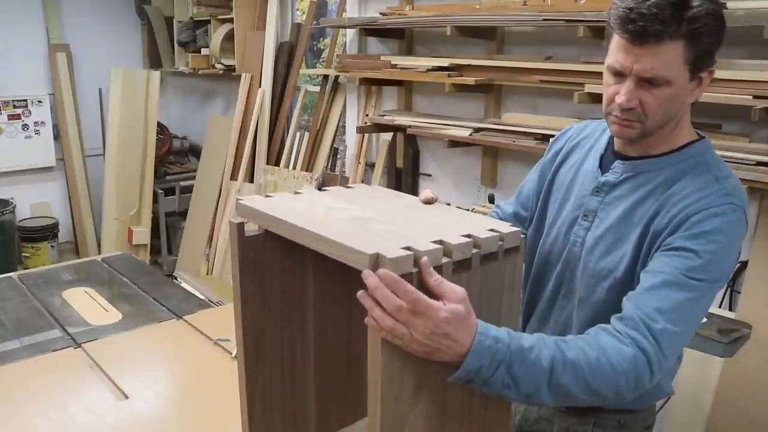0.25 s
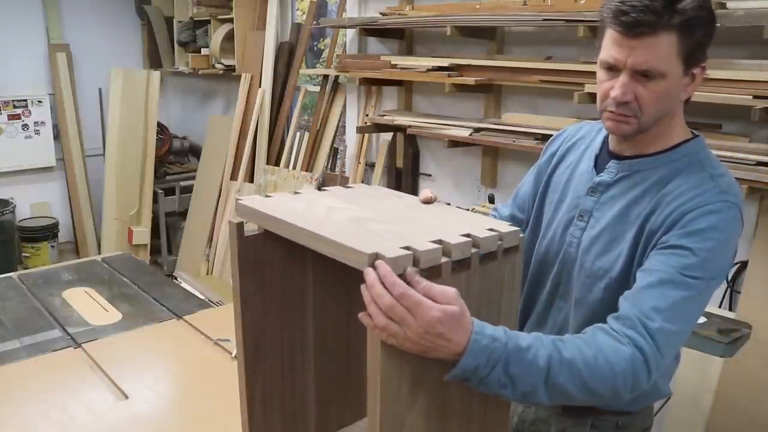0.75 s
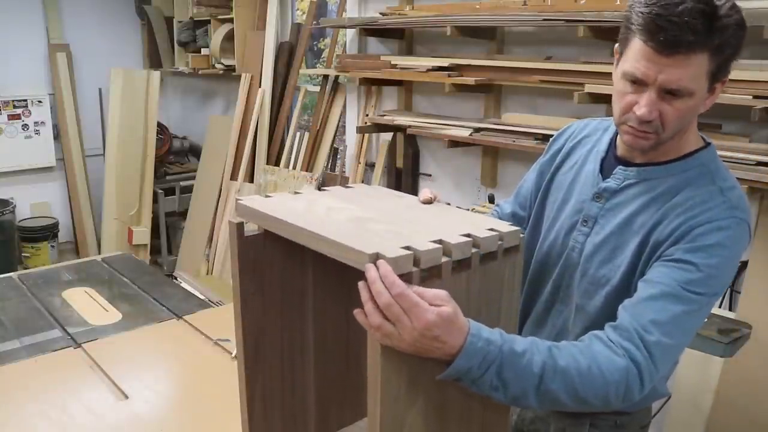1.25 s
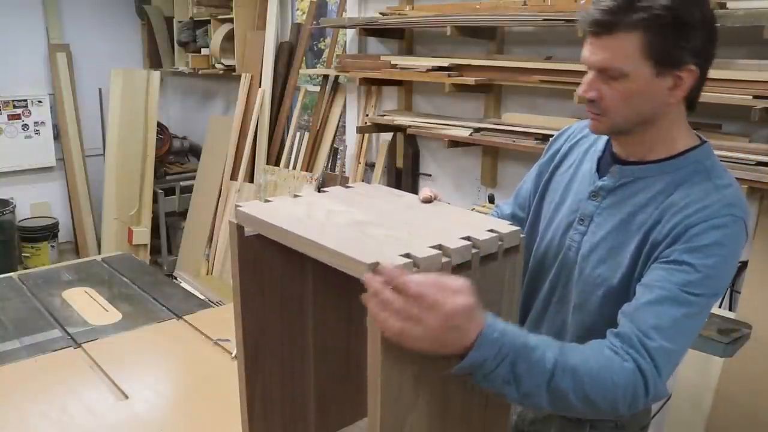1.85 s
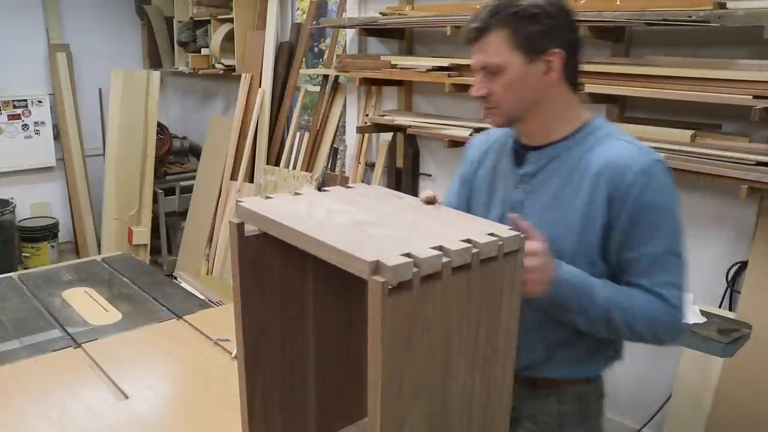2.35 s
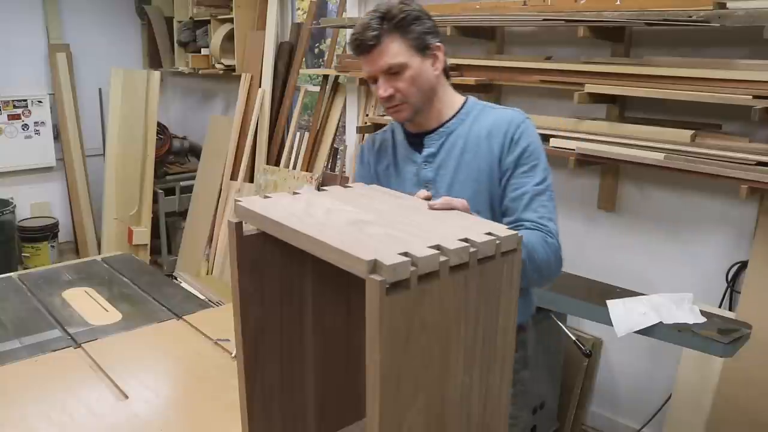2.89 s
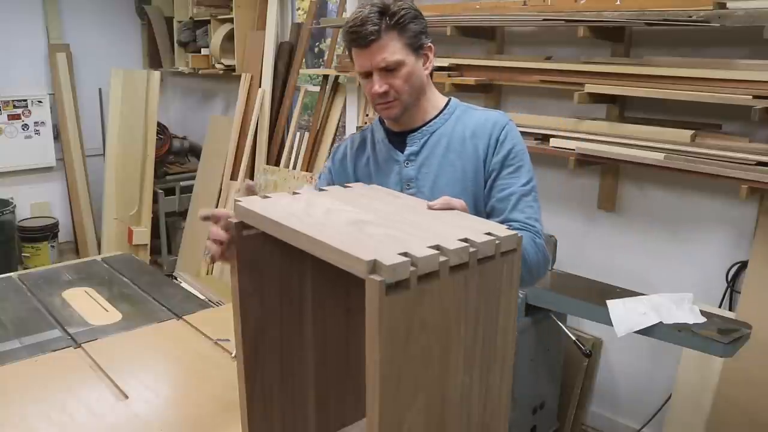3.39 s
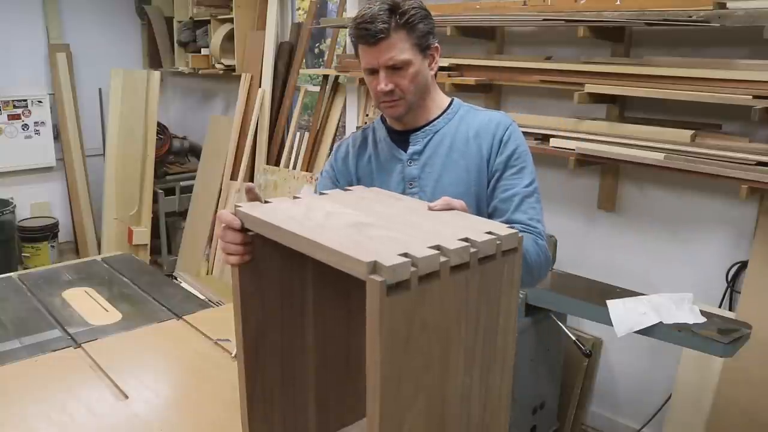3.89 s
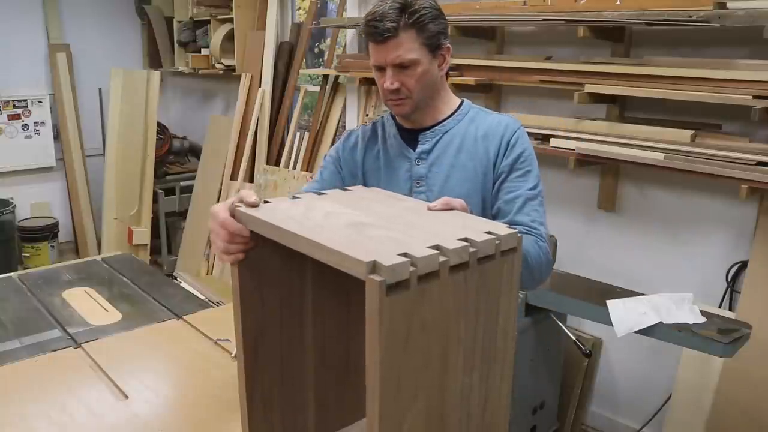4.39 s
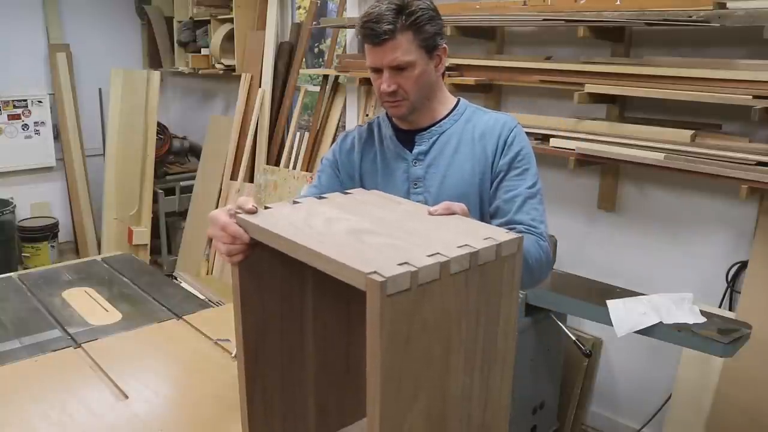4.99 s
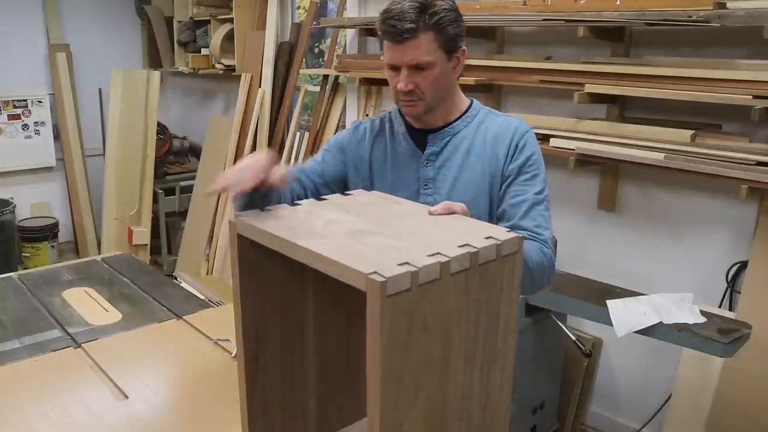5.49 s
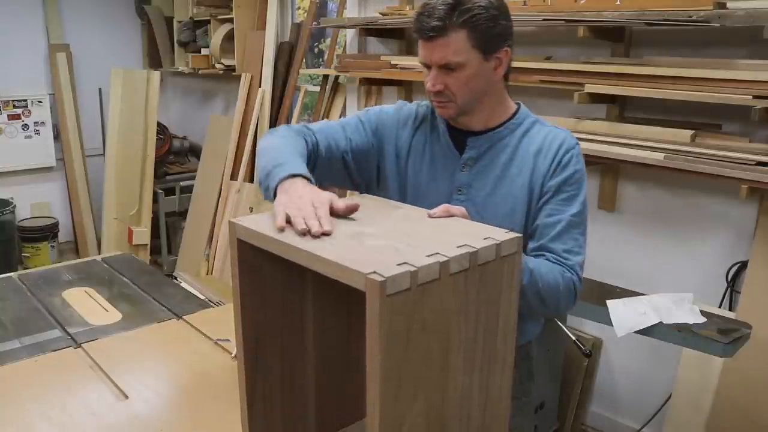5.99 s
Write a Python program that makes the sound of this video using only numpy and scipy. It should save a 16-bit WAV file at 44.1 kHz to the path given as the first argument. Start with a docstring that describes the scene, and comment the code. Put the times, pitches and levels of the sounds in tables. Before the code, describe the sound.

Scattered hollow knocks and soft scrapes of a wooden case being pushed together, then two loud hand slaps on the wood.

```python
"""A small workshop: a dovetailed hardwood case is fitted together by hand.
Joints rub, judder and knock as the top board is pushed home; each blow rings the case and its loose
top panel. Fingers tick, a sleeve brushes, a shoe scuffs once. Two hard palm slaps seat the board
and drive a limiter. Behind it all: a short room echo, still air, faint hiss."""
import sys
import numpy as np
from scipy import signal
from scipy.fft import rfft, irfft, next_fast_len
from scipy.io import wavfile
from scipy.ndimage import uniform_filter1d

SR = 44100
rng = np.random.default_rng(int(sys.argv[2]) if len(sys.argv) > 2 else 0)


def store_wav(level_fs):
    """Save 16-bit WAV to argv[1]."""
    pcm = np.round(np.clip(np.atleast_2d(level_fs), -1, 1) * 32767)
    wavfile.write(sys.argv[1], SR, pcm.T.astype(np.int16))


N = 275624
TIME_S = np.arange(N) / SR
AGE_S = TIME_S[:SR * 3 // 4]
LOW_CUT_HZ, HIGH_CUT_HZ = 33, 15900

# palm slaps: t/s, level/dB, hardness/dB, spot f/Hz (pitch the struck spot favours)
SLAPS = [(5.7552, -13.5, 0, 258), (6.0085, -5, -0.5, 323)]
# slides ending in a knock: t/s, knock level/dB, hardness/dB, spot f/Hz, slide rise/s, slide level/dB
PUSHES = [(1.3645, -28, -1, 296, 0.056, -49.5), (1.845, -40.5, -5.5, 298, 0.067, -46.5),
          (1.983, -37.5, -1.5, 89, 0.046, -44.5), (3.659, -38, -2.5, 275, 0.037, -42),
          (4.9573, -18.5, 3, 610, 0.1, -41.5), (5.129, -38.5, -3, 98.4, 0.015, -38)]
# loose board bumping the case: t/s, level/dB, hardness/dB, spot f/Hz
BUMPS = [(0.196, -44, 8, 347), (0.215, -25, 1, 360), (0.712, -55, -3, 203), (1.575, -59, -11, 87),
         (2.25, -52.5, 18.5, 397), (2.856, -45.5, -5, 147), (2.937, -36.5, 14.5, 180), (3.638, -36, 0, 530),
         (4.559, -47, -6, 125), (5.596, -40.5, 2, 523)]
# edges of the five registers (boom, body, knock, clack, crack): f/Hz
REGISTER_EDGES_HZ = (45, 200, 600, 1800, 5000, 15000)
# palm on wood, per register: gain/dB
SLAP_COLOUR_DB = (-9, -0.5, 0, -3.5, -10)
# wood on wood, per register: gain/dB
KNOCK_COLOUR_DB = (1.5, 0.5, -5.5, -19, -34.5)
# hard contact trades boom for crack, per register: gain/(dB per dB of hardness)
HARDNESS_SLOPES = (-1.24, -0.038, 0.54, 1.59, 2)
# case modes: f/Hz, level/dB, t60/s
CASE_MODES = [(92, -12.5, 0.14), (146, -1, 0.061), (216.6, 1, 0.08), (262.2, 11, 0.087), (330, 5, 0.066),
              (382, -30, .14), (415, -28, 0.15), (570, -3.5, 0.083), (627, -56, 0.083), (811, -8.5, 0.11),
              (1174, -3, 0.11), (1240, 3, 0.024), (1506, -19, 0.13), (1643, -25.5, 0.09), (2300, -5, .06),
              (2650, -5, 0.094), (2910, -1.5, 0.11), (2870, -16, 0.05), (4500, -33, 0.037)]
# dense, short-lived case modes: f/Hz, density/dB
CLATTER_SPECTRUM = [(50, -5), (160, 5.5), (330, 7.5), (700, -3), (1400, -5), (2000, -7), (2900, -2.5),
                    (4000, -11), (6000, -20), (10000, -23), (15000, -19.5)]
# top panel modes: f/Hz, level/dB re the blow's register, t60/s
PANEL_MODES = [(87.7, 0, 0.21), (134.6, 2.5, 0.28), (352, 10.5, 0.1), (506, 0.5, .2), (648, 0.5, 0.093),
               (1019.4, 0, 0.22)]
# board eased to and fro: peak t/s, rise/s, level/dB
RUBS = [(.39, 0.0085, -52.5), (.52, .06, -57), (.67, .06, -55.5), (.83, 0.026, -62), (1.25, 0.062, -59),
        (1.9, 0.051, -51), (4.27, 0.17, -56.5), (4.46, 0.1, -55), (4.56, 0.055, -41.5), (5.39, 0.04, -47),
        (5.5, 0.11, -57.5)]
# wood friction: f/Hz, density/dB
RUB_SPECTRUM = [(88, -27), (150, -0.5), (324, -0.5), (728, -8.5), (1600, 0.5), (2270, -5), (2500, 0.5),
                (3670, -12.5), (4290, -10), (4810, -14.5), (5200, -14.5), (15000, -38.5)]
# joint resonances: f/Hz, width/Hz, gain/dB
JOINT_RESONANCES = [(350, 200, -5.5), (633.6, 27, 6), (840, 72, 0), (998, 36, 5), (1143, 30, 5.5),
                    (1600, 38, -4), (2370, 16, -11), (3006, 72, 7.5), (4280, 77, -6.5)]
# tight joint slipping: peak t/s, rise/s, level/dB, low-pass f/Hz
JUDDERS = [(.005, 0.047, -39, 1140), (3.514, 0.011, -42, 3580)]
# modes ringing as it breaks free: f/Hz, level/dB re the judder, t60/s
JUDDER_MODES = [(90, -5.5, 0.2), (146.4, -5, 0.18), (351, -1.5, 0.66), (612, 1.5, 0.29), (1134, 4, 0.23),
                (1580, -1.5, 0.17)]
# fingers and edges on wood: t/s, level/dB, centre f/Hz
TICKS = [(1.866, -44, 10000), (1.902, -44, 10000), (2.039, -49, 10500), (2.249, -38, 7450),
         (3.297, -48, 1730), (3.922, -38, 1180), (4.05, -44, 2880)]
# sleeve and palm strokes: peak t/s, rise/s, level/dB
BRUSHES = [(2.59, 0.053, -49), (2.67, 0.13, -46), (2.885, 0.048, -45), (2.97, 0.081, -45.5),
           (5.615, 0.02, -37.5), (5.655, 0.031, -34.5)]
# sleeve and palm friction: f/Hz, density/dB
BRUSH_SPECTRUM = [(53, -34), (90, -5), (562, -0.5), (743, -8), (810, -2.5), (1070, -5.5), (1390, -6.5),
                  (2950, -5), (4080, -15), (15500, -28.5)]
# shoe friction: f/Hz, density/dB
SCUFF_SPECTRUM = [(180, -25), (330, 1.5), (630, -5.5), (1050, 0.5), (1600, -9), (2900, -13), (4000, -17.5),
                  (5700, -20), (6500, -28.5), (14000, -41)]
# workshop echo: f/Hz, t60/s, gain/dB
ECHO_BANDS = [(60.6, 0.54, 2.5), (159, 0.37, -7.5), (410, 0.5, -4), (1190, 0.59, -7), (3150, 0.53, -4),
              (5130, 0.47, -9.5), (8050, 0.36, -11.5), (14000, 0.23, -20)]
# still air: f/Hz, density/dB
AIR_SPECTRUM = [(15, -8.5), (25, 3), (96, -6.5), (129, -4.5), (148, -14), (246, -11.5), (523, -20),
                (762, -21.5), (826, -16), (895, -27.5), (1140, -18), (4150, -28.5), (6050, -33),
                (15500, -36.5)]
# channel hiss: f/Hz, density/dB
HISS_SPECTRUM = [(15, -14), (25, -2), (523, -5), (895, -16), (4040, -8), (15500, -3.5)]


def blows(rows, colour_db, contact_hz, clatter_db, clatter_t60_s, crack_t60_s, panel_damping_db=0):
    """Each blow rings case and panel; contact hardness tilts the five registers."""
    out = np.zeros(N)
    for t_s, db, hardness_db, spot_hz in rows:
        levels_db = db + np.array(colour_db) + hardness_db * np.array(HARDNESS_SLOPES)
        wood = case_ring(spot_hz, clatter_db, clatter_t60_s)
        wood = low_pass(wood, contact_hz * from_db(hardness_db))
        registers = [band(wood, low_hz, high_hz, order=3)
                     for low_hz, high_hz in zip(REGISTER_EDGES_HZ, REGISTER_EDGES_HZ[1:])]
        registers[-1] *= decay(crack_t60_s)
        for register, level_db in zip(registers, levels_db):
            peak_rms = np.sqrt(uniform_filter1d(register ** 2, size=512).max())
            add(out, t_s, from_db(level_db) * register / peak_rms)
        add(out, t_s, panel_ring(levels_db - panel_damping_db, spot_hz))
    return out


def case_ring(spot_hz, clatter_db, clatter_t60_s, spot_lead_db=7):
    """Distinct modes, weighted by the struck spot, plus dense modes as decaying noise."""
    modes = 0
    for k, (hz, db, t60_s) in enumerate(CASE_MODES):
        spot_db = spot_lead_db * (spot_coupling(hz, spot_hz) - .5)
        modes += (-1) ** k * mode(hz, db + spot_db + rng.normal(0, 3.1), t60_s)
    clatter = coloured(rng.standard_normal(len(AGE_S)), CLATTER_SPECTRUM)
    return modes + from_db(clatter_db) * clatter * decay(clatter_t60_s)


def panel_ring(levels_db, spot_hz, spot_lead_db=12):
    """The loose panel rings on; each mode follows its register, weaker if the spot misses it."""
    out = 0
    for hz, db, t60_s in PANEL_MODES:
        drive_db = levels_db[np.searchsorted(REGISTER_EDGES_HZ, hz) - 1]
        miss_db = spot_lead_db * (1 - spot_coupling(hz, spot_hz))
        out += mode(hz, db + drive_db - miss_db, t60_s)
    return out


def spot_coupling(hz, spot_hz, reach_oct=0.23):
    """1 at the spot's pitch or three times it, 0 far away."""
    return max(np.exp(-(np.log2(hz / (k * spot_hz)) / reach_oct) ** 2) for k in (1, 3))


def sliding_joints(stop_s=0.029, ring_db=-3):
    """Fine slips hiss and ring the boards; a push swells to its knock, then stops."""
    slides = [(t_s, rise_s, stop_s, db) for t_s, *_, rise_s, db in PUSHES]
    pressure = stroke_envelope(slides + free_strokes(RUBS, fall_per_rise=1.06))
    fine = slips(rate_hz=3000, spread_db=0.5)
    return pressure * coloured(fine, RUB_SPECTRUM) + from_db(ring_db) * joint_ring(pressure * fine)


def juddering_joints(fall_s=0.072, rasp_db=-1):
    """A tight joint slips coarsely: it rasps, resonates and rings on."""
    out = 0
    for t_s, rise_s, db, top_hz in JUDDERS:
        coarse = slips(rate_hz=1300, spread_db=2)
        pressure = stroke_envelope([(t_s, rise_s, fall_s, db)])
        rasp = from_db(rasp_db) * pressure * coloured(coarse, RUB_SPECTRUM)
        judder = joint_ring(pressure * coarse) + rasp
        add(judder, t_s, from_db(db) * sum(mode(*row) for row in JUDDER_MODES))
        out += low_pass(judder, top_hz)
    return out


def joint_ring(force):
    """Two boards in contact resonate; unit power gain for a white drive."""
    def resonate(x):
        return sum((-1) ** k * from_db(db) * signal.lfilter(*signal.iirpeak(hz, hz / width_hz, fs=SR), x)
                   for k, (hz, width_hz, db) in enumerate(JOINT_RESONANCES))
    return resonate(force) / np.linalg.norm(resonate(signal.unit_impulse(len(AGE_S))))


def slips(rate_hz, spread_db, bunch_db=2.5, bunch_hz=110):
    """Friction: tiny random impulses whose size wanders with the grip; rms 1."""
    grip = np.interp(TIME_S * bunch_hz, np.arange(N), rng.standard_normal(N))
    sizes = from_db(spread_db * rng.standard_normal(N) + bunch_db * grip)
    slipping = rng.random(N) < rate_hz / SR
    return unit_rms(slipping * rng.choice([-1, 1], N) * sizes)


def finger_ticks(edge_ratio=1.63, t60_at_1khz_s=0.057):
    """Light contacts: noise bursts, the higher the briefer."""
    out = np.zeros(N)
    for t_s, db, hz in TICKS:
        burst = unit_rms(band(rng.standard_normal(len(AGE_S)), hz / edge_ratio, hz * edge_ratio))
        add(out, t_s, from_db(db) * burst * decay(t60_at_1khz_s / (hz / 1000) ** 0.67))
    return out


def sleeve_brushes():
    """Sleeve and palm slide in dense slips."""
    pressure = stroke_envelope(free_strokes(BRUSHES, fall_per_rise=1.15))
    return pressure * coloured(slips(rate_hz=9200, spread_db=-2.5), BRUSH_SPECTRUM)


def shoe_scuff(land_s=2.343, peak_s=2.383, rise_s=0.057, fall_s=0.1, level_db=-36):
    """A sole lands abruptly and slides."""
    pressure = (TIME_S > land_s) * stroke_envelope([(peak_s, rise_s, fall_s, level_db)])
    return pressure * coloured(slips(rate_hz=2900, spread_db=3), SCUFF_SPECTRUM)


def shop_echo(x, delay_s=0.0087, build_s=0.0053):
    """Walls and timber racks: lows keep their pitch, treble scatters into a wash and dies sooner."""
    edges_hz = np.r_[45, 100, 200, np.geomspace(400, 16000, 16)]
    onset = 1 - np.exp(-np.maximum(AGE_S - delay_s, 0) / build_s)
    response, wash = 0, 0
    for low_hz, high_hz in zip(edges_hz, edges_hz[1:]):
        hz = np.sqrt(low_hz * high_hz)
        gain = from_db(at_hz(ECHO_BANDS, hz, column=2))
        fade = onset * decay(at_hz(ECHO_BANDS, hz))
        wash_share = np.interp(hz, (200, 300, 3500, 6000), (0, .4, .4, 1))
        tail = band(rng.standard_normal(len(AGE_S)), low_hz, high_hz) * fade
        tail_energy = (1 - wash_share) * 2 * (high_hz - low_hz) / SR
        response += gain * np.sqrt(tail_energy) * tail / np.linalg.norm(tail)
        if wash_share:
            envelope = echo_envelope(band(x, low_hz, high_hz, order=3), fade)
            noise = unit_rms(band(rng.standard_normal(N), low_hz, high_hz, order=3))
            wash += gain * np.sqrt(wash_share) * envelope * noise
    return signal.fftconvolve(x, response)[:N] + wash


def echo_envelope(x, fade, hop=32):
    """Echo rms: the power of x smeared over the fade."""
    power = uniform_filter1d(x ** 2, size=hop)[::hop]
    kernel = fade[::hop] ** 2
    smeared = signal.fftconvolve(power, kernel / kernel.sum())[:len(power)]
    return np.interp(TIME_S, TIME_S[::hop], np.sqrt(np.abs(smeared)))


def air_and_hiss(air_db=-56.5, hiss_db=-65.5):
    """Steady noise: shared room air, separate hiss per channel."""
    air = coloured(rng.standard_normal(N), AIR_SPECTRUM)
    hiss = np.array([coloured(white, HISS_SPECTRUM) for white in rng.standard_normal((2, N))])
    return from_db(air_db) * air + from_db(hiss_db) * hiss


def stroke_envelope(rows):
    """Gaussian rise and fall about each peak, summed in power."""
    power = 0
    for peak_s, rise_s, fall_s, db in rows:
        width_s = np.where(TIME_S < peak_s, rise_s, fall_s)
        power += from_db(db) ** 2 * np.exp(-np.pi * ((TIME_S - peak_s) / width_s) ** 2)
    return np.sqrt(power + 1e-24)


def free_strokes(rows, fall_per_rise):
    return [(peak_s, rise_s, fall_per_rise * rise_s, db) for peak_s, rise_s, db in rows]


def mode(hz, db, t60_s):
    return from_db(db) * decay(t60_s) * np.sin(2 * np.pi * hz * AGE_S)


def decay(t60_s):
    return np.exp(-np.log(1000) * AGE_S / t60_s)


def coloured(x, spectrum):
    """Spectral shaping; rms 1."""
    size = next_fast_len(len(x), real=True)
    gain = from_db(at_hz(spectrum, np.fft.rfftfreq(size, 1 / SR)))
    return unit_rms(irfft(rfft(x, size) * gain, size)[:len(x)])


def at_hz(table, hz, column=1):
    table = np.array(table)
    return np.interp(np.log(hz + 1e-9), np.log(table[:, 0]), table[:, column])


def band(x, low_hz, high_hz, order=2):
    return signal.sosfilt(signal.butter(order, [low_hz, high_hz], "band", fs=SR, output="sos"), x)


def low_pass(x, hz):
    return signal.sosfilt(signal.butter(2, min(hz, HIGH_CUT_HZ), fs=SR, output="sos"), x)


def from_db(db):
    return 10 ** (np.asarray(db) / 20)


def unit_rms(x):
    return x / np.sqrt(np.mean(x ** 2) + 1e-20)


def add(track, t_s, sound):
    start = round(t_s * SR)
    track[start:start + len(sound)] += sound[:N - start]


def scene():
    """Handwork, echo and air, alike in both channels except for the hiss."""
    stops = [push[:4] for push in PUSHES]
    knocks = blows(stops + BUMPS, KNOCK_COLOUR_DB, contact_hz=1380,
                   clatter_db=8.5, clatter_t60_s=0.1, crack_t60_s=0.1)
    slaps = blows(SLAPS, SLAP_COLOUR_DB, contact_hz=11700,
                  clatter_db=14, clatter_t60_s=0.074, crack_t60_s=0.027, panel_damping_db=8)
    wood = knocks + slaps + finger_ticks() + sliding_joints() + juddering_joints()
    direct = wood + sleeve_brushes() + shoe_scuff()
    return direct + shop_echo(direct) + air_and_hiss()


def record(dry, threshold_db=-8.5, release_db_per_s=101, attack_s=0.0068, ceiling=0.59):
    """Low cut, limiter ducking on the slaps, soft clip, high cut."""
    dry = signal.sosfilt(signal.butter(2, LOW_CUT_HZ, "high", fs=SR, output="sos"), dry)
    over_db = np.maximum(20 * np.log10(np.abs(dry).max(axis=0) + 1e-9) - threshold_db, 0)
    release_db = release_db_per_s * TIME_S
    held_db = np.maximum.accumulate(over_db + release_db) - release_db
    pole = np.exp(-1 / (attack_s * SR))
    duck_db = signal.lfilter([1 - pole], [1, -pole], held_db)
    rounded = ceiling * np.tanh(dry * from_db(-duck_db) / ceiling)
    return signal.sosfilt(signal.ellip(10, .1, 80, HIGH_CUT_HZ, fs=SR, output="sos"), rounded)


dry = scene()
out = record(dry)
store_wav(out)
```